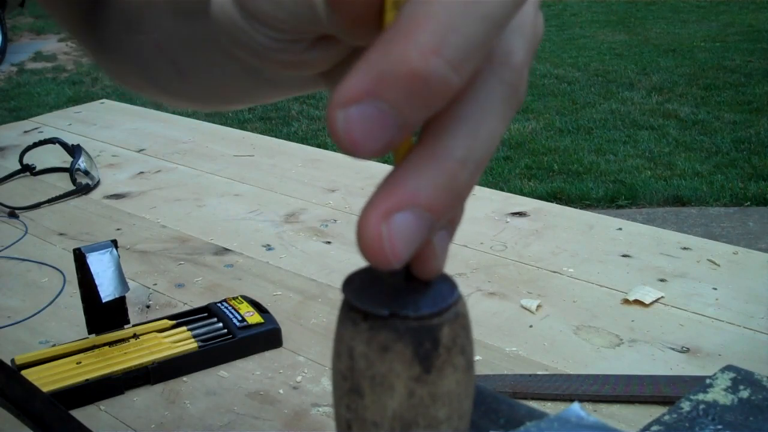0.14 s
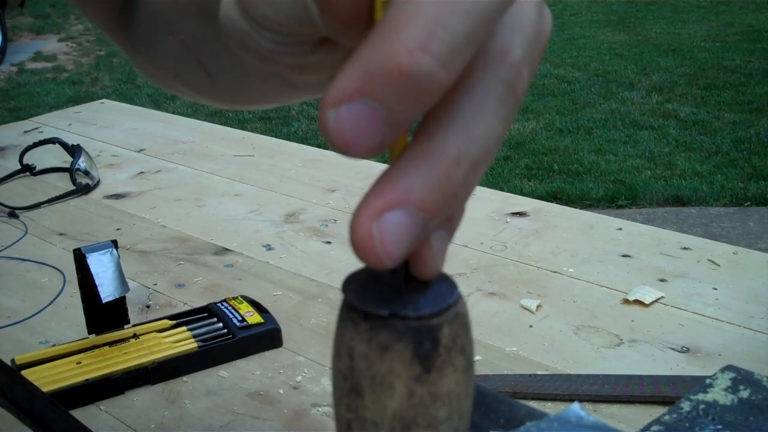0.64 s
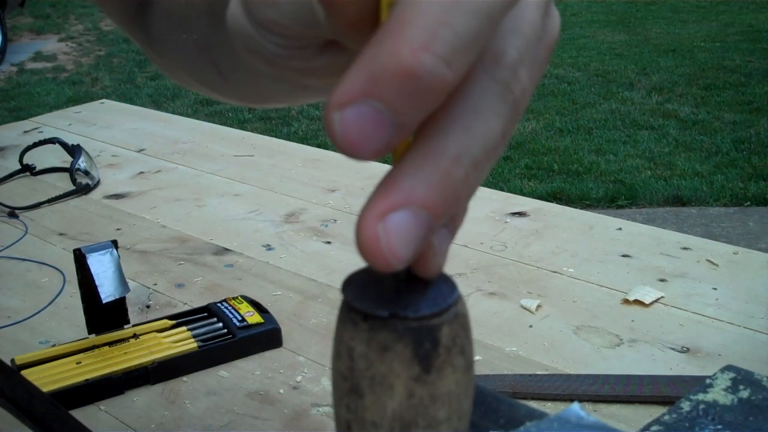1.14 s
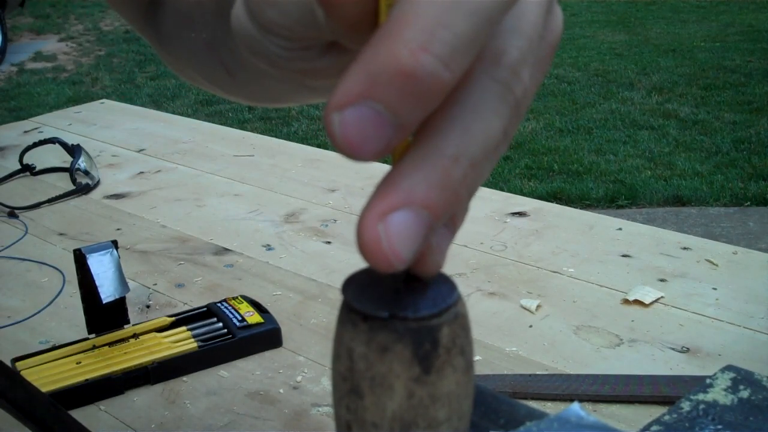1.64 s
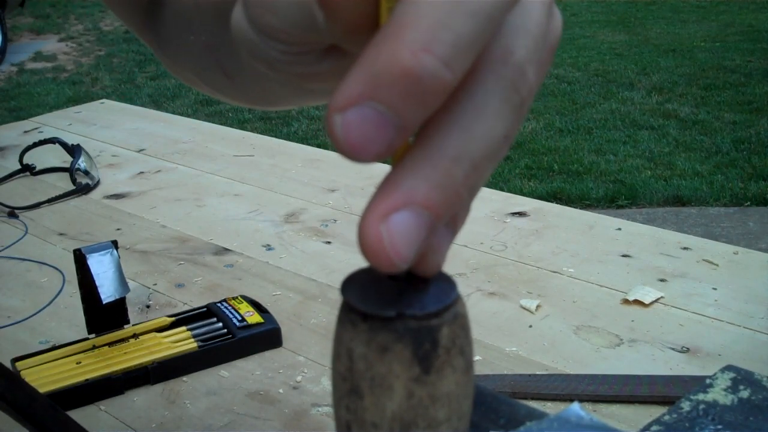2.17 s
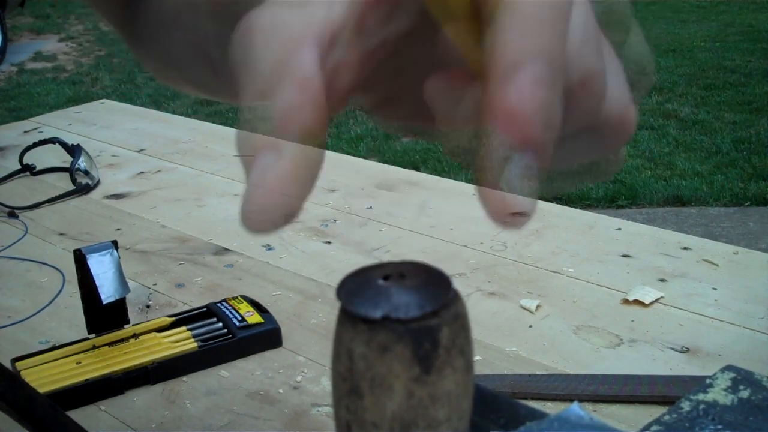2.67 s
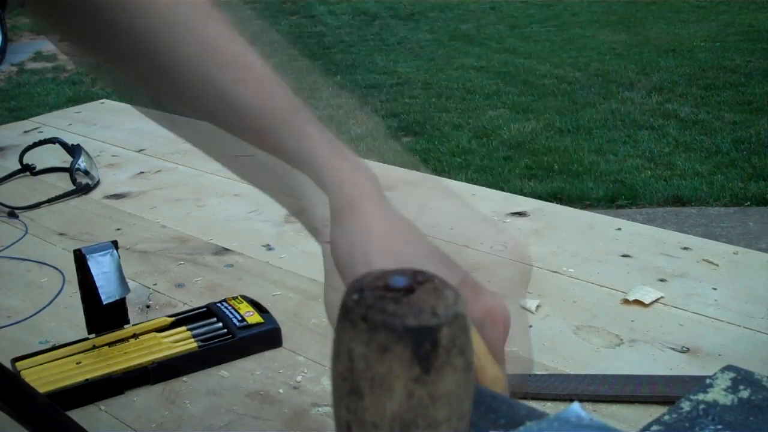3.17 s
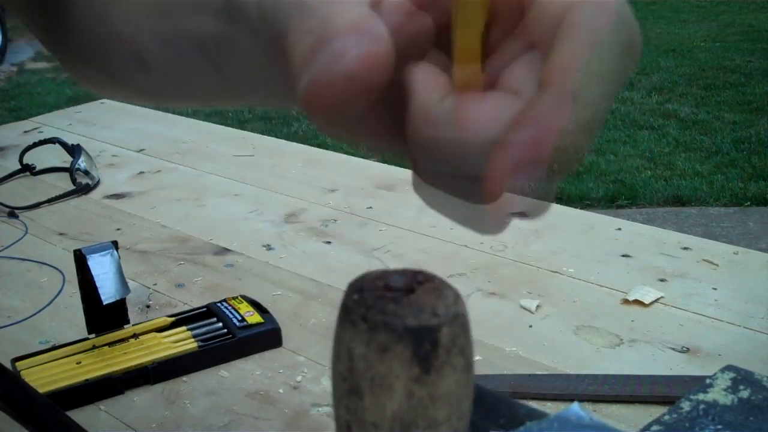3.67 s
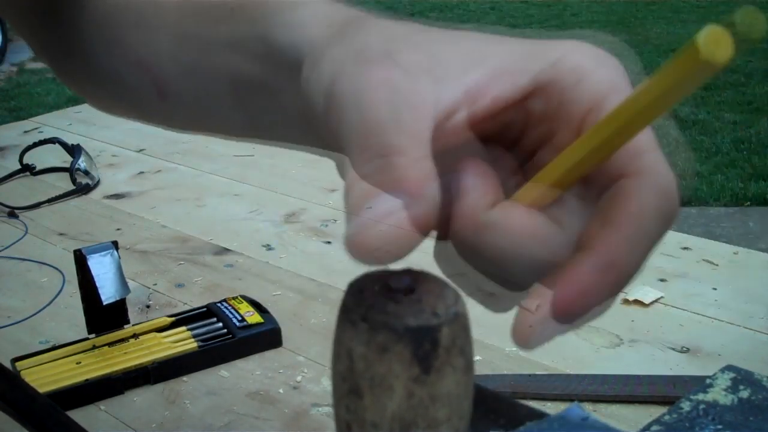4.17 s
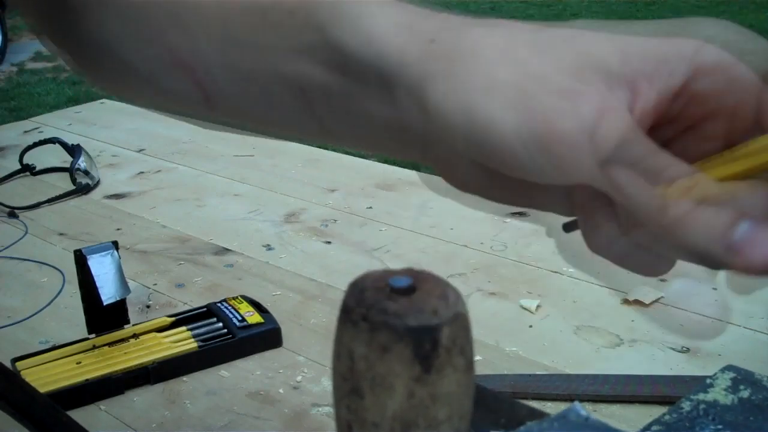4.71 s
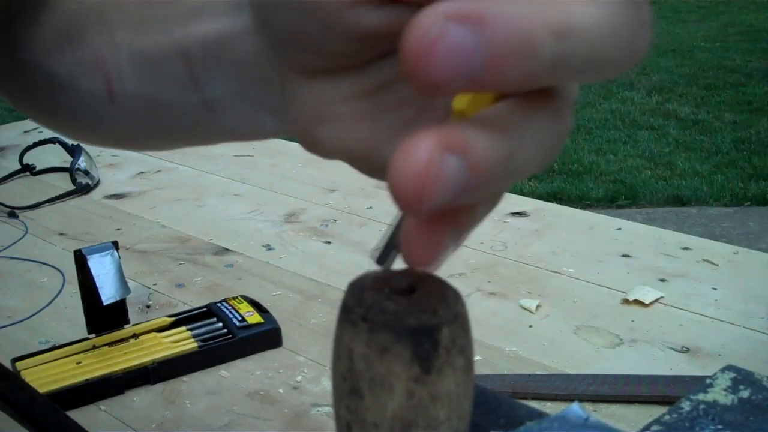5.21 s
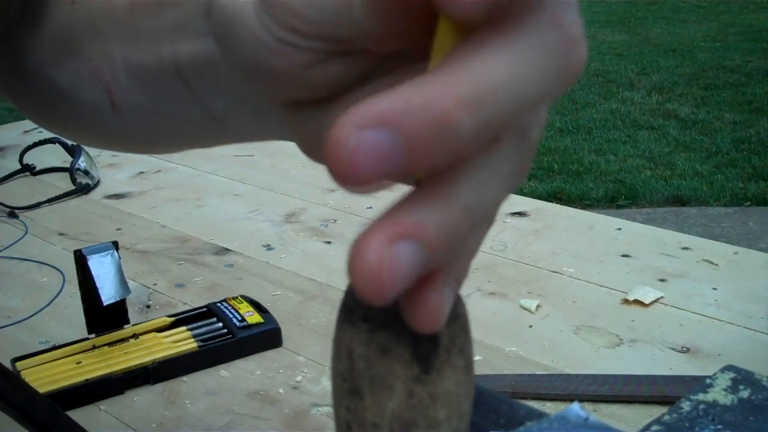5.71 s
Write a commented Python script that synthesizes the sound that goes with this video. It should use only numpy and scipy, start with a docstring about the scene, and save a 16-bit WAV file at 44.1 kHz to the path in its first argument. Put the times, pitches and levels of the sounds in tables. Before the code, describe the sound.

Quiet outdoor air with low rumble and a faint far motor hum; a soft scrape and two tiny ticks open it. At about 0.45 s a hammer cracks on a steel punch, ringing high and briefly, with two weaker clacking rebounds at 0.6 and 0.65 s. Harder blows follow at 1.05, 1.45 and 1.85 s, harsh and clipped, with a bright ringing cap, rattling boards, woody bench resonance and a short diffuse tail from the yard. A gentler blow lands at 2.4 s. Near 3 s the cap is lifted with rough scrapes and clicks; dull wooden knocks come around 3.45 s. From 4 to 5 s there are short hollow rasps, hissy rubs and rapid dry ticks. At 5.4 s the punch is set down with a small knock and scrape, then slight rubbing and barely audible thin whistles. Close stereo camera microphone, overloaded by the blows.

```python
"""Five hard hammer blows crack and ring outdoors, the first followed by two light rebounds.
Scrapes and ticks come before and after, knocks later. Close to a camera, a hammer strikes a steel punch
on a metal cap over a wooden stump; blows overload the input. Shaped noise makes cracks, rattling boards
and yard; damped sines ring steel, cap, wood and bench. Gritty noise through resonances makes scrapes, tiny
bursts ticks. Air, rumble, a far motor's hum and faint whistles are shaped noise and wavering sines."""
import sys
import numpy as np
from scipy import signal
from scipy.fft import rfft, irfft, next_fast_len
from scipy.io import wavfile
from scipy.ndimage import uniform_filter1d, map_coordinates

SR = 44100
rng = np.random.default_rng(int(sys.argv[2]) if len(sys.argv) > 2 else 0)


def decibels_to_gain(level_db):
    """Convert a level in decibels to a linear amplitude gain (20 dB per decade)."""
    exponent = np.asarray(level_db, float) / 20
    return 10 ** exponent


def transcribe(u):
    """Save the signal u as a 16-bit wav file named by the first command-line argument.

    u: samples, shape (n,) or (channels, n), limited to [-1, 1]; the rate is SR.
    q: integer samples, one column per channel.
    """
    v = np.clip(np.atleast_2d(u).T, -1, 1)
    q = np.round(v * 32767).astype(np.int16)
    wavfile.write(sys.argv[1], SR, q)


N = 257544  # length [samples]

# stereo width of diffuse sound: (frequency [Hz], left-right likeness [-1 to 1])
LIKENESS = [(60, 0), (250, 0.93), (1400, 0.7), (3000, 0.27), (6500, 0), (14000, 0.14)]
# ringing punch: (frequency [Hz], level [dB], t60 [s], left over right [dB])
PUNCH_MODES = [(2712, -1.5, 0.045, -5), (3038, 4, 0.0227, -3.5), (3650, -6, 0.03, -2.5),
               (4260, -4, 0.041, -6), (5385, -1.5, 0.06, 4.5), (5788, -2, 0.036, -9)]
# color of the steel crack: (frequency [Hz], relative density [dB])
CRACK_COLOR = [(100, -19), (900, -2.5), (1700, -6), (2300, 1.5), (3000, 3.5), (6000, 9.5), (8600, -1.5),
               (15000, -33.5)]
# decay of the crack: (frequency [Hz], t60 [s])
CRACK_DECAY = [(300, 0.098), (3000, 0.025), (8000, 0.023), (12000, 0.011)]
# color of the loose boards: (frequency [Hz], relative density [dB])
BOARD_COLOR = [(60, 10), (300, 0.5), (900, -3), (1700, 0), (3800, -7), (6000, -30.5), (9000, -61)]
# decay of the loose boards: (frequency [Hz], t60 [s])
BOARD_DECAY = [(150, 0.055), (700, 0.35), (3000, 0.17)]


def unit(x):
    """Scales a sound to rms 1."""
    return x / np.sqrt(np.mean(x ** 2) + 1e-20)


def along(points, hz):
    """Reads a curve of (frequency, value) points on a log frequency axis."""
    f, v = np.transpose(points)
    return np.interp(np.log(hz + 1), np.log(f + 1), v)


def curves(rows):
    """Draws one value per sample for each column after the time."""
    s, *cols = np.transpose(rows)
    return np.array([np.interp(np.arange(N) / SR, s, c) for c in cols])


def wobble(rate):
    """Draws a smooth random curve with rate knots a second."""
    knots = rng.standard_normal(int(N * rate / SR) + 4)
    return map_coordinates(knots, [np.arange(N) * rate / SR])


def filtered(x, response):
    """Shapes a sound by a complex frequency response."""
    m = next_fast_len(x.shape[-1] + 8192)
    spectrum = rfft(x, m) * response(np.fft.rfftfreq(m, 1 / SR))
    return irfft(spectrum, m)[..., :x.shape[-1]]


def resonant(peaks):
    """Gives the causal response of (center [Hz], width [Hz], level [dB]) resonances, alternating in sign."""
    def response(f):
        total = 0
        for k, (center, width, db) in enumerate(peaks):
            band = 1j * f * width / (center * center - f * f + 1j * f * width)
            total = total + (-1) ** k * decibels_to_gain(db) * band
        return total
    return response


def ports(x, likeness):
    """Mixes two unrelated sounds to the left-right likeness of each frequency."""
    def mid_side(hz):
        turn = np.arccos(np.clip(along(likeness, hz), -1, 1)) / 2
        return np.array([np.cos(turn), np.sin(turn)])
    mid, side = filtered(x, mid_side)
    return np.array([mid + side, mid - side])


def grit(size, step=60):
    """Uneven gain of rms 1, a knot every step samples: many small contacts instead of a smooth rush."""
    knots = rng.standard_normal(size // step + 4)
    return unit(decibels_to_gain(4 * map_coordinates(knots, [np.arange(size) / step])))


def dying(color, t60, size, rise):
    """Stereo noise of rms 1 given an onset of rise seconds; each frequency dies at its own speed."""
    source = ports(rng.standard_normal((2, size)), LIKENESS)
    noise = unit(filtered(source, lambda hz: decibels_to_gain(along(color, hz))))
    hz, t, z = signal.stft(noise, SR, nperseg=128)
    decay = decibels_to_gain(-60 * t / along(t60, hz)[:, None])
    tail = signal.istft(z * decay, SR, nperseg=128)[1][:, :size]
    return tail * (1 - np.exp(-np.arange(size) / SR / rise))


def ringing(modes, t, scatter):
    """Damped modes with random level and phase at every strike; each needs a few cycles to build up."""
    hz, db, t60, pan_db = np.transpose(modes)[:, :, None]
    level_chance, phase_chance = scatter * rng.standard_normal((2, len(modes), 1))
    waves = decibels_to_gain(db + level_chance - 60 * t / t60) * np.sin(2 * np.pi * hz * t + phase_chance)
    waves *= 1 - np.exp(-t * hz / 2.3)
    return np.array([np.sum(waves * decibels_to_gain(side * pan_db / 2), 0) for side in (1, -1)])


def place(out, s, sound):
    """Adds a sound to the mix from s seconds on."""
    out[:, round(s * SR):][:, :sound.shape[1]] += sound


def air():
    """Outdoor air: stereo noise whose time-frequency patches gently swell and fade."""
    # (frequency [Hz], relative density [dB])
    color = [(20, 3.5), (59, -16), (95, -2), (140, -9.5), (440, -11.5), (1030, -9), (1600, -10.5),
             (4400, -14.5), (6050, -9), (8300, -18.5), (9000, -25.5), (14100, -29), (14300, -47)]
    # (time [s], level [dB])
    level = [(0, -50), (5.84, -50)]
    _, _, z = signal.stft(rng.standard_normal((2, N)), nperseg=512)
    patches = uniform_filter1d(rng.standard_normal(z.shape[1:]), 6, 0)
    patches = uniform_filter1d(patches, 12, 1)
    noise = signal.istft(z * decibels_to_gain(1.15 * unit(patches)), nperseg=512)[1][:, :N]
    shaped = unit(filtered(ports(noise, LIKENESS), lambda f: decibels_to_gain(along(color, f))))
    return shaped * decibels_to_gain(curves(level)[0])


def rumble():
    """Low rumble: noise through a doubled narrow resonance, wandering in level."""
    # (time [s], level [dB])
    level = [(0, -71), (.9, -62), (2.7, -63), (4.6, -85.5), (5.15, -63), (5.6, -73)]
    noise = filtered(rng.standard_normal(N), lambda f: resonant([(103, 18, 0)])(f) ** 2)
    return unit(noise) * decibels_to_gain(curves(level)[0])


def hum():
    """A far motor: sines that drift in level and pitch."""
    # (center frequency [Hz], central rms level [dB])
    partials = [(166, -72.5), (332, -71), (495, -76)]
    out = 0
    for hz, db in partials:
        level = np.sqrt(2) * decibels_to_gain(db + 2.1 * wobble(3.0))
        pitch = hz * (1 + 0.00604 * wobble(1.0))
        out = out + level * np.sin(2 * np.pi * np.cumsum(pitch) / SR)
    return out


def scrapes():
    """Rough contact: uneven slips under each stroke excite deep and hollow wood, a rasp and a bright hiss."""
    # strokes of hand and tool: (start [s], length [s], deep level [dB], hollow level [dB], hiss level [dB])
    strokes = [(-.05, 0.21, -61, -61, -51), (2.935, 0.066, -51.5, -39, -44), (2.98, 0.045, -46, -40, -37.5),
               (3.024, 0.038, -60, -48, -49.5), (3.969, 0.091, -48.5, -39, -35),
               (4.031, 0.027, -53, -35.5, -51), (4.104, 0.0182, -74, -58, -33),
               (4.382, 0.0097, -60, -54, -42), (4.421, 0.0265, -59, -62, -42.5),
               (4.503, 0.027, -54.5, -37, -35.5), (4.793, 0.023, -45, -32.5, -29),
               (5.4194, 0.011, -39.5, -30, -36.5), (5.546, 0.065, -40, -45.5, -45.5),
               (5.709, 0.019, -51.5, -56, -68)]
    # resonances, each passed twice: (center [Hz], width of one pass [Hz], level of one pass [dB])
    deep = [(583, 80, -1.5), (938, 320, 5)]
    hollow = [(1120, 260, -3), (1400, 110, 0), (1880, 60, -4.5), (2700, 55, -5)]
    rasp = [(2230, 240, 0), (2663, 125, 2), (2980, 150, 2.5), (3840, 340, 0), (5470, 270, -5.5)]
    hiss = [(5740, 4560, 2), (7260, 1300, 8.5), (9600, 3000, -7)]
    start, length, deep_db, hollow_db, hiss_db = np.transpose(strokes)[:, :, None]
    # the rasp draws on both the deep wood and the hiss
    rasp_gain = np.hypot(decibels_to_gain(deep_db - 1), decibels_to_gain(hiss_db - 15))
    layers = [  # (resonances, stroke gains, left over right [dB], t60 [s])
        (deep, decibels_to_gain(deep_db), -2.5, .1),
        (hollow, decibels_to_gain(hollow_db), -2.5, .05),
        (rasp, rasp_gain, -2.5, .08),
        (hiss, decibels_to_gain(hiss_db), 3, .015)]
    t = np.arange(N) / SR
    swells = np.sin(np.pi * np.clip((t - start) / length, 0, 1)) ** 0.5
    slips = decibels_to_gain(4 * wobble(400) + 1.2 * wobble(120))
    close = [(500, 1.0), (8000, 0.75)]  # (frequency [Hz], left-right likeness)
    out = 0
    for peaks, gain, pan_db, t60 in layers:
        # the rubbed thing sounds on a little: stroke power is smeared by its decay
        fade_power = decibels_to_gain(-60 * t[:SR // 5] / t60) ** 2
        power = np.sum(swells * gain, 0) ** 2
        level = np.sqrt(np.abs(signal.fftconvolve(power, fade_power / np.sum(fade_power))[:N]))

        def body(f):
            twice = resonant(peaks)(f) ** 2
            return twice / np.sqrt(np.mean(np.abs(twice) ** 2))
        noise = unit(slips * ports(rng.standard_normal((2, N)), close))
        out = out + filtered(level * noise, body) * decibels_to_gain([[pan_db / 2], [-pan_db / 2]])
    return out


def ticks():
    """Small hard contacts: noise dying within milliseconds through resonances, alone or in stick-slip runs."""
    # single ticks: (time [s], peak level [dB])
    singles = [(2.4885, -27), (4.4093, -32)]
    # evenly spaced runs: (first [s], last [s], gap [s], first peak level [dB], last peak level [dB])
    # with random scatter added to the levels
    runs = [(.1867, .2004, .0137, -36, -32), (2.9505, 3.0021, .0172, -26, -22),
            (4.1047, 4.1157, .0037, -19, -18), (4.1794, 4.182, .0026, -27, -31),
            (4.616, 4.6477, .0053, -23, -28), (4.8467, 4.8582, .0115, -23, -15.5),
            (4.872, 4.96, .022, -39, -38)]
    # (center [Hz], width [Hz], level [dB])
    peaks = [(2650, 800, -15.5), (4000, 1700, -10), (6720, 790, 7.5), (12500, 9000, -27)]
    out, t, rows = np.zeros(N), np.arange(300) / SR, list(singles)
    for first, last, gap, first_db, last_db in runs:
        share = np.linspace(0, 1, round((last - first) / gap) + 1)
        scatter_db = 2.5 * rng.standard_normal(len(share))
        levels = first_db + share * (last_db - first_db) + scatter_db
        rows += zip(first + share * (last - first), levels)
    for s, db in rows:
        touch = 1.1 * rng.standard_normal(len(t))
        touch[0] = 1
        tick = filtered(decibels_to_gain(-60 * t / 0.004) * touch, resonant(peaks))
        out[round(s * SR):][:len(t)] += decibels_to_gain(db) * tick / np.abs(tick).max()
    return out * decibels_to_gain([[.8], [-.8]])  # slightly left


def steel_crack(size, force_db):
    """The crack of steel on steel: a gritty noise burst, duller when the contact is softer."""
    # (frequency [Hz], left over right [dB])
    lean = [(300, -2), (1300, 2.5), (2400, -9.5), (4300, -4), (9000, 0.5)]
    top_hz = 19160 * decibels_to_gain(force_db)
    burst = dying(CRACK_COLOR, CRACK_DECAY, size, rise=0.0002) * np.sqrt(grit(size))

    def tone(f):
        return decibels_to_gain(np.outer([.5, -.5], along(lean, f))) / (1 + 1j * f / top_hz) ** 2
    return decibels_to_gain(force_db) * filtered(burst, tone)


def contact(t, force_db, steel_db, punch_db, rattle_db):
    """Steel meets steel: a crack, ringing steel and wood, rattling boards, the bench and the yard."""
    # ringing hammer head, wood and bench: (frequency [Hz], level [dB], t60 [s], left over right [dB])
    head_modes = [(4997, 0, .375, 2), (8899, -25, .3, 0), (12800, -32, .2, 0)]
    wood_modes = [(780, -1, .07, -3), (980, 0, .065, -4), (1210, -4, .05, -4), (1378, -7, .06, -4)]
    bench_modes = [(183, 0, .34, 0), (317, 10, .15, -1), (490, -10, .8, -1), (568, 2, .25, -2),
                   (673, 4, .17, -2)]
    # color of the yard's answer: (frequency [Hz], relative density [dB])
    yard_color = [(100, 3.5), (500, 5.5), (1500, -5), (4600, -9), (5400, 1), (8200, -2), (9300, -24.5),
                  (15000, -44.5)]
    # decay of the yard's answer: (frequency [Hz], t60 [s])
    yard_decay = [(500, 0.81), (5000, 1), (12000, 1)]
    size, steady, loose = len(t), .2, 1.5  # the last two scatter the strikes
    # each layer gains its own number of dB for each dB of force
    wood_db = -18.5 + 0.09 * force_db
    yard_db = -50.5 + 1.586 * force_db
    sway_db = -56.5 + 2.88 * force_db

    out = steel_crack(size, force_db)
    out += decibels_to_gain(steel_db) * ringing(head_modes, t, steady)
    out += decibels_to_gain(punch_db) * ringing(PUNCH_MODES, t, steady)
    out += decibels_to_gain(wood_db) * ringing(wood_modes, t, loose)

    boards = resonant([(hz, 60, 0) for hz, *_ in bench_modes[1:] + wood_modes + PUNCH_MODES[:3]])
    clatter = dying(BOARD_COLOR, BOARD_DECAY, size, rise=.004)
    clatter = clatter * grit(size) ** 1.5 * grit(size, step=900) ** .7
    out += decibels_to_gain(rattle_db + np.array([[-2], [2]])) * filtered(clatter, lambda f: .4 + boards(f))

    yard = dying(yard_color, yard_decay, size, rise=0.0055) * np.sqrt(grit(size))
    bench = decibels_to_gain(6.5) * ringing(bench_modes[1:], t, steady) * (1 - np.exp(-t / 0.0015))
    out += decibels_to_gain(yard_db) * (yard + bench)

    # the lowest bench mode builds up slowly, and mainly under hard blows
    sway_rise = 1 - np.exp(-(t / 0.058) ** 2)
    out += decibels_to_gain(sway_db) * ringing(bench_modes[:1], t, steady) * sway_rise
    return out


def chatter(size, force_db):
    """The cap jumps and comes down again after a blow: gritty noise colored by the punch."""
    steel = resonant([(hz, 90, db) for hz, db, *_ in PUNCH_MODES])
    delay = round(.014 * SR)
    landing = dying(CRACK_COLOR, [(1000, 0.11)], size, rise=0.017) * grit(size) ** 1.08
    landing = filtered(landing, lambda f: (1.07 + 1.7 * steel(f)) / (1 + (f / 8900) ** 16))
    out = np.zeros((2, size))
    out[:, delay:] = decibels_to_gain(-44.5 + 2.34 * force_db) * landing[:, :-delay]
    return out


def jolt(t):
    """The shock to the camera: one smooth bump, mostly on the left port."""
    return np.outer([1, .15], t / 0.000319 * np.exp(1 - t / 0.0013))


def hammer():
    """Full blows also ring and toss the cap and jolt the camera; rebounds mostly clack and rattle."""
    # full blows: (time [s], force [dB], head ring [dB], punch ring [dB], cap ring [dB], jolt [dB])
    blows = [(0.4562, 6.5, -12.5, -7.5, -43.5, -17.5), (1.064, 13, -15.5, -2.5, 12, -6),
             (1.4665, 14, -15, 0.5, 9, -8), (1.864, 13, -21.5, -1, 9, -4),
             (2.4268, 4.5, -22.5, -7.5, -9, -36)]
    # bounces back onto the punch: (time [s], force [dB], head ring [dB], jolt [dB])
    rebounds = [(0.6067, -1, -22, -49), (.6487, -9, -28.5, -56)]
    # ringing cap: (frequency [Hz], level [dB], t60 [s], left over right [dB])
    cap_modes = [(7419, 0, .045, 1), (7540, -45, .6, 1), (7575, -9, .05, 1), (11400, -52, .15, 0)]
    size = SR * 3 // 4
    out, t = np.zeros((2, N + size)), np.arange(size) / SR
    for s, force_db, steel_db, punch_db, cap_db, jolt_db in blows:
        blow = contact(t, force_db, steel_db, punch_db, rattle_db=-33.5 + 1.766 * force_db)
        blow += decibels_to_gain(cap_db) * ringing(cap_modes, t, .2)
        blow += chatter(size, force_db)
        place(out, s, blow - decibels_to_gain(jolt_db) * jolt(t))
    for s, force_db, steel_db, jolt_db in rebounds:
        # loose contact: punch and rattle grow in step with the force
        bounce = contact(t, force_db, steel_db, punch_db=-7.5 + force_db, rattle_db=-18.5 + force_db)
        place(out, s, bounce - decibels_to_gain(jolt_db) * jolt(t))
    return out[:, :N]


def knocks():
    """Tool and cap lightly knock wood: small cracks and hand-damped boards; the punch set down rings briefly."""
    # (time [s], crack level [dB], rattle level [dB])
    touches = [(3.4343, -62, -40.5), (3.4493, -29.5, -32), (3.495, -38.5, -39), (5.422, -46, -42)]
    # the punch is set on the cap: (time [s], level [dB])
    set_down = (5.421, -41)
    size = SR // 4
    out, t = np.zeros((2, N + size)), np.arange(size) / SR
    for s, crack_db, rattle_db in touches:
        knock = decibels_to_gain(crack_db) * dying(CRACK_COLOR, CRACK_DECAY, size, rise=0.00014)
        damped = decibels_to_gain(rattle_db - 60 * t / 0.2)
        knock += damped * dying(BOARD_COLOR, BOARD_DECAY, size, rise=0.0001)
        place(out, s, knock)
    place(out, set_down[0], decibels_to_gain(set_down[1]) * ringing(PUNCH_MODES, t, 0.79))
    return out[:, :N]


def whistles():
    """Faint thin tones: sines that swell and fade, flutter in level and sag a little in pitch."""
    # (start [s], length [s], starting pitch [Hz], level [dB])
    tones = [(5.315, .12, 3320, -58), (5.745, .04, 3290, -57)]
    out, flutter = 0, decibels_to_gain(3.5 * wobble(60))
    for start, length, hz, db in tones:
        share = np.clip((np.arange(N) / SR - start) / length, 0, 1)
        pitch = hz * (1 - 0.0236 * share)
        out = out + decibels_to_gain(db) * np.sin(np.pi * share) * np.sin(2 * np.pi * np.cumsum(pitch) / SR)
    return np.sqrt(2) * flutter * out


def scene():
    """Mixes all sources; the left port is a little farther away and hears later."""
    lag = 1.37  # [samples]
    outdoors = (air() + rumble() + hum() + whistles()) * decibels_to_gain([[-1.2], [1.2]])  # leans right
    sound = outdoors + scrapes() + ticks() + hammer() + knocks()
    return filtered(sound, lambda f: np.exp(-1j * np.pi * f * lag / SR * np.array([[1], [-1]])))


def top_cut(x):
    """Nothing passes above the cut-off."""
    return signal.sosfilt(signal.butter(12, 15200, fs=SR, output="sos"), x)


def record(dry):
    """The input stage clips hard, then loses the lowest bass and the extreme treble."""
    clipped = dry / (1 + np.abs(dry / .9) ** 12) ** (1 / 12)

    def band(f):
        return 1j * f / (30 + 1j * f) / (1 + (f / 15200) ** 80)
    limited = filtered(clipped, band)
    return top_cut(limited)


dry = scene()
out = record(dry)
transcribe(out)
```